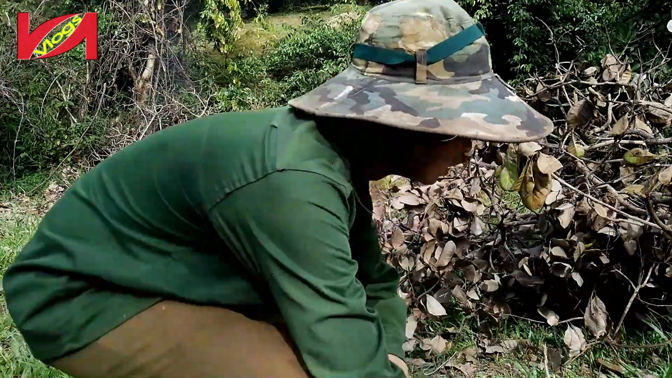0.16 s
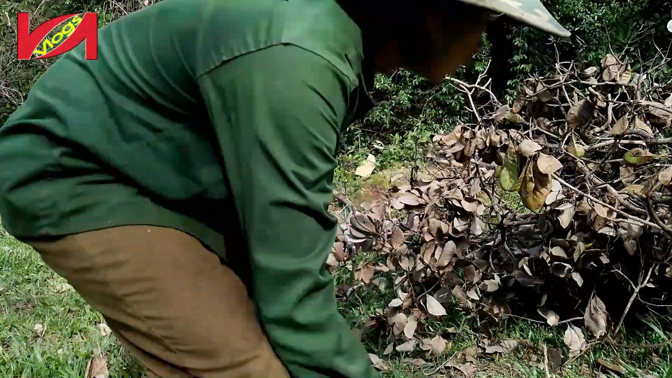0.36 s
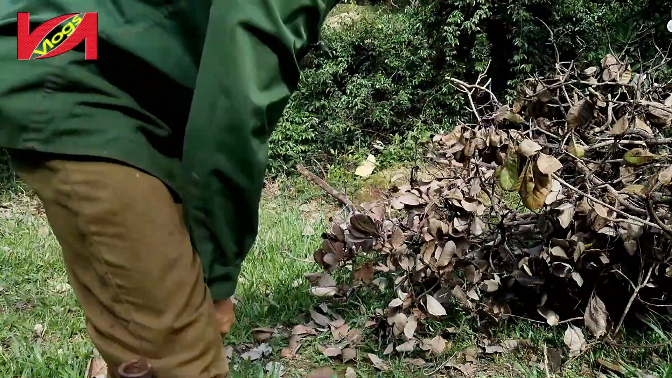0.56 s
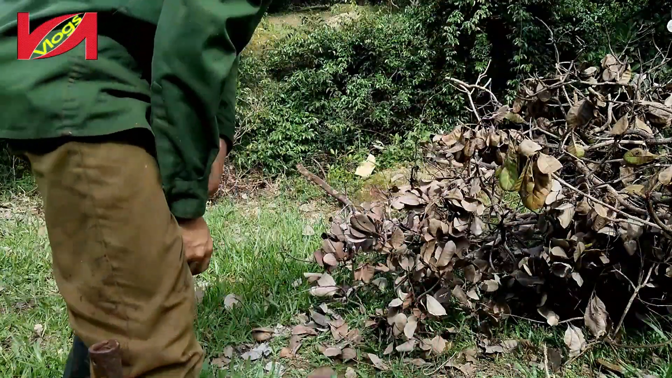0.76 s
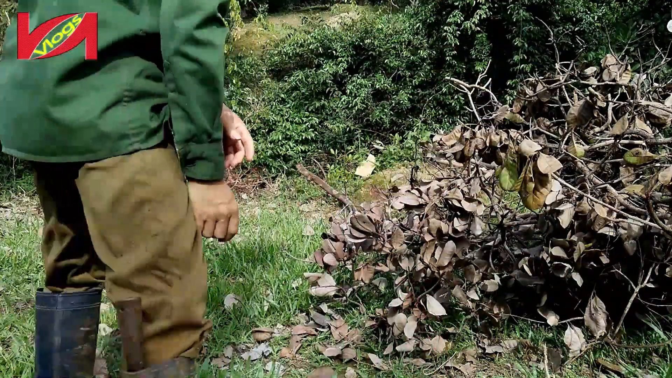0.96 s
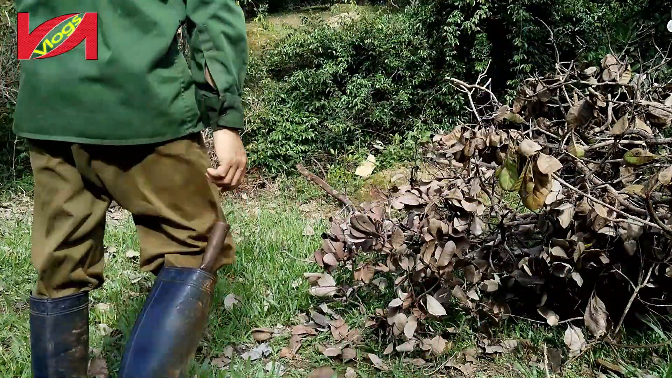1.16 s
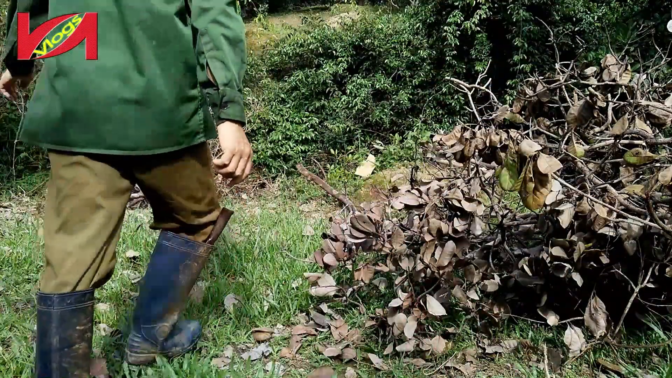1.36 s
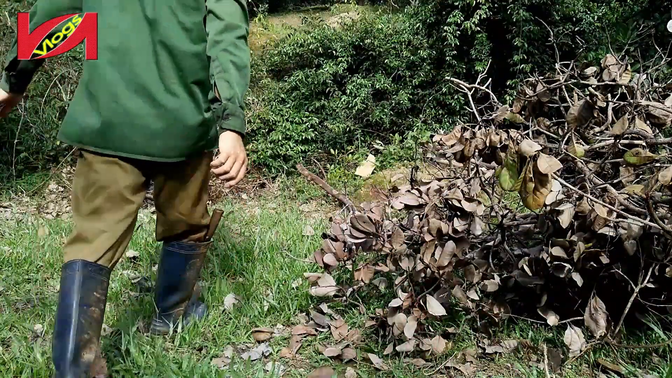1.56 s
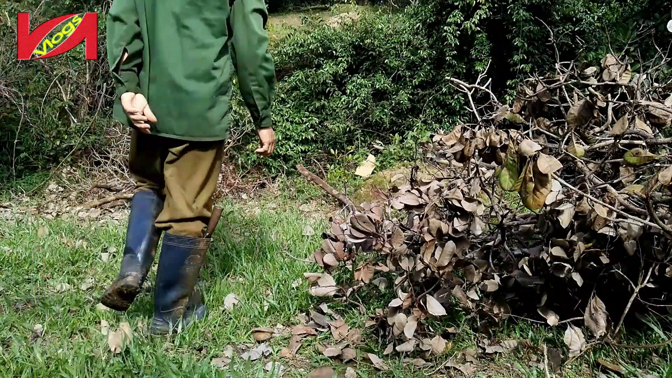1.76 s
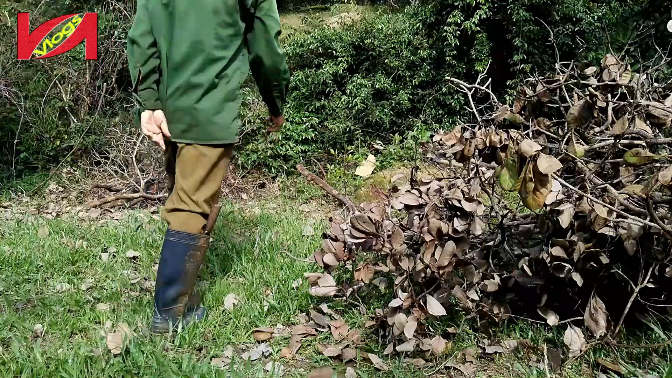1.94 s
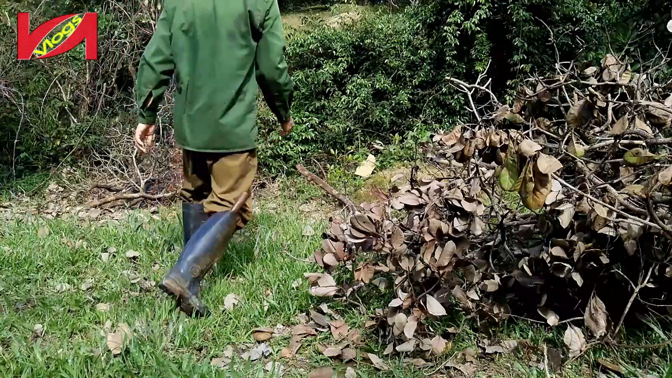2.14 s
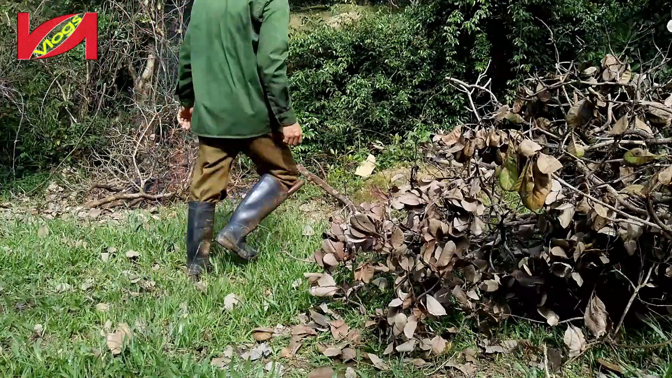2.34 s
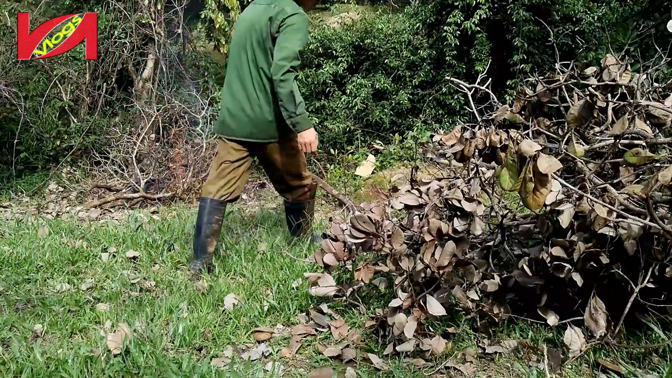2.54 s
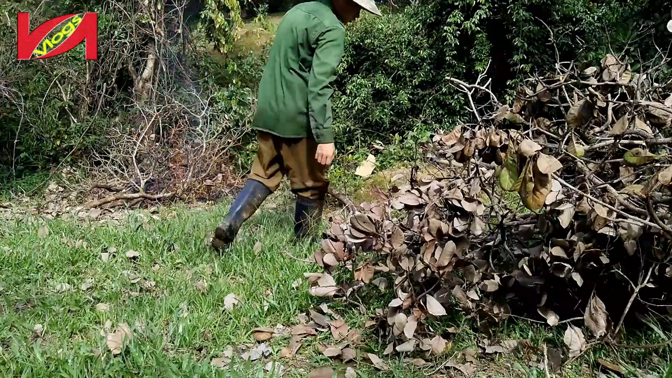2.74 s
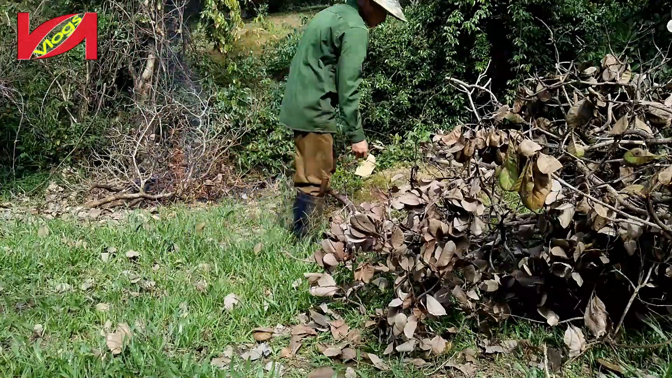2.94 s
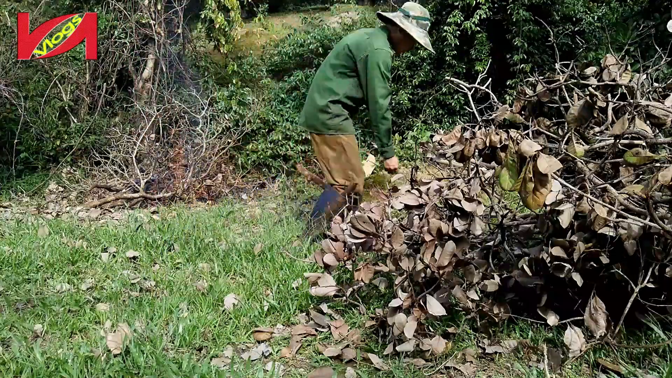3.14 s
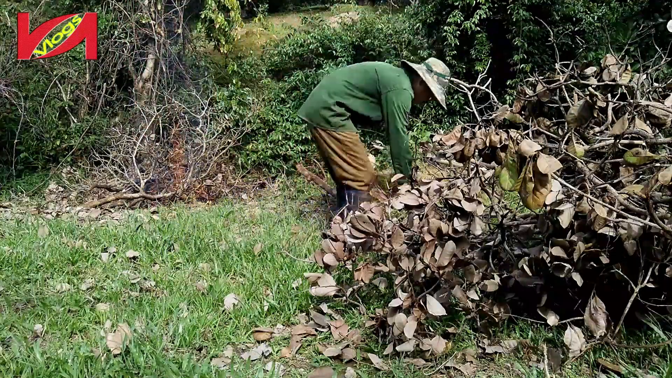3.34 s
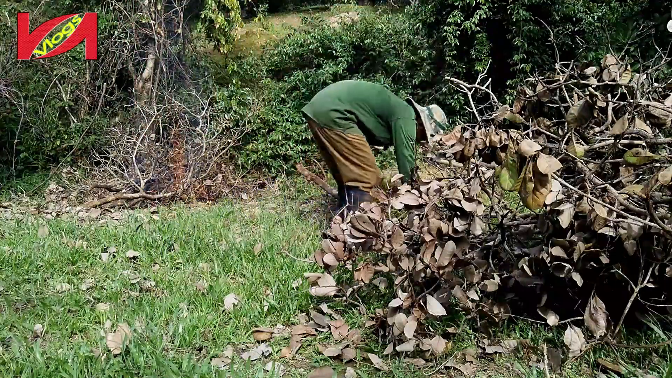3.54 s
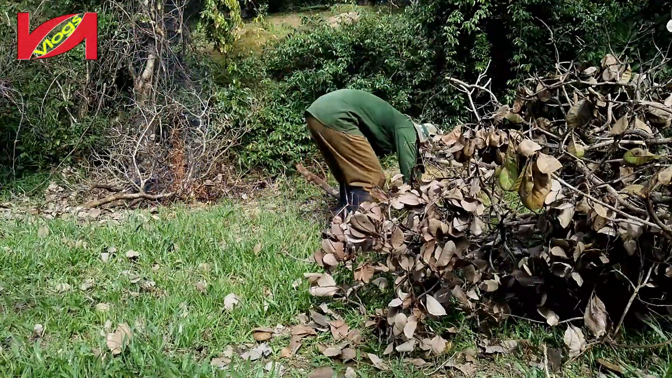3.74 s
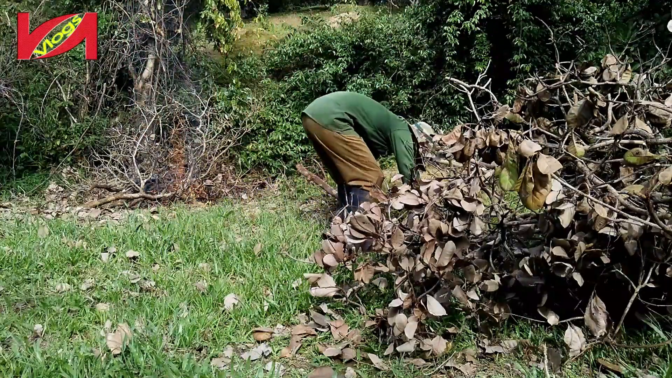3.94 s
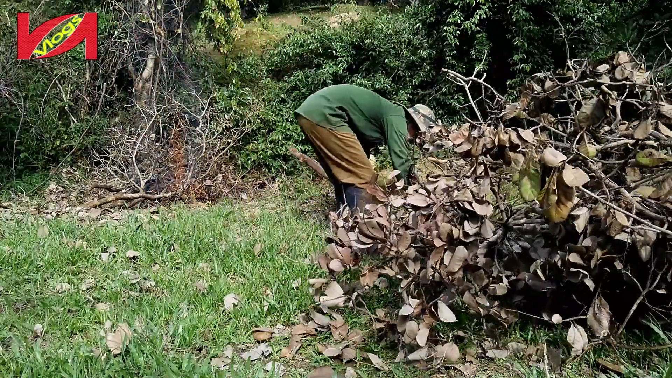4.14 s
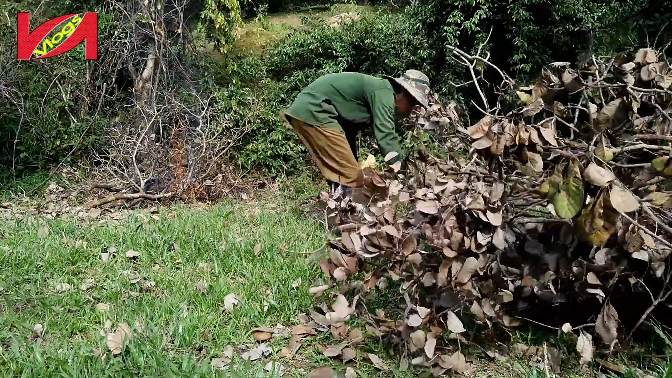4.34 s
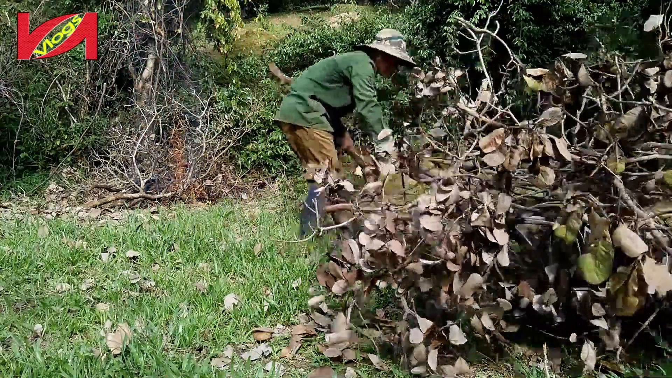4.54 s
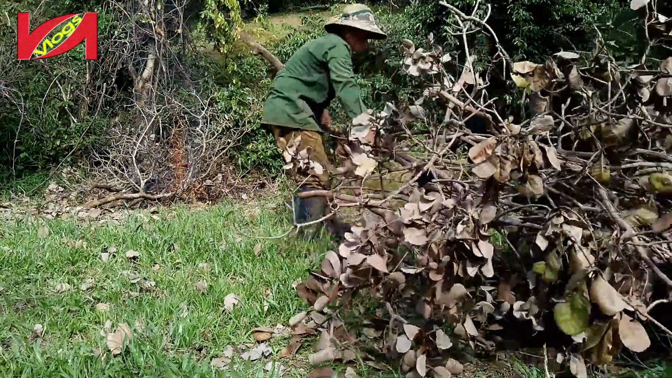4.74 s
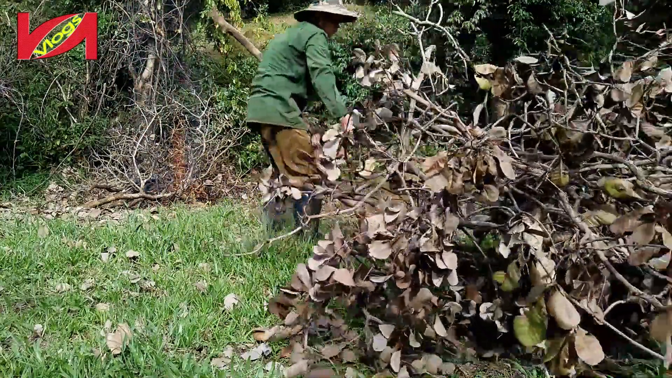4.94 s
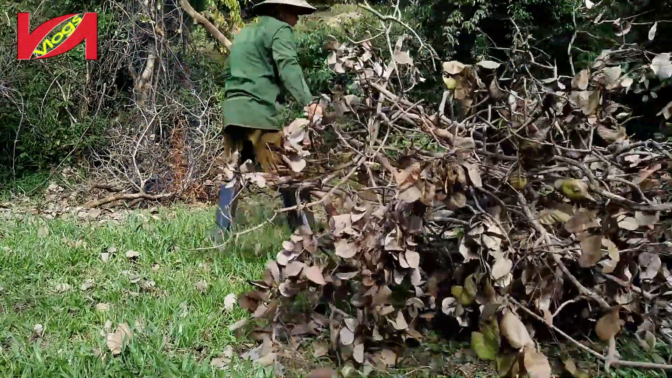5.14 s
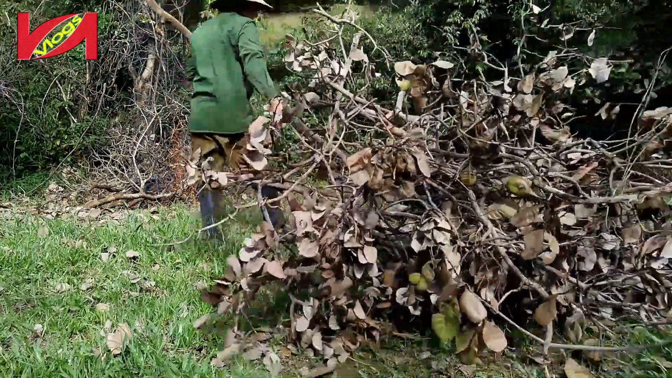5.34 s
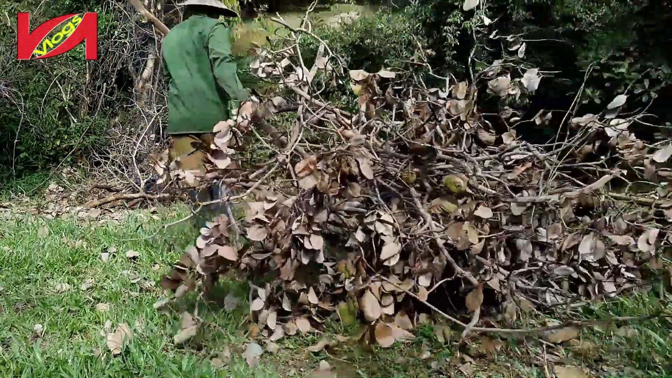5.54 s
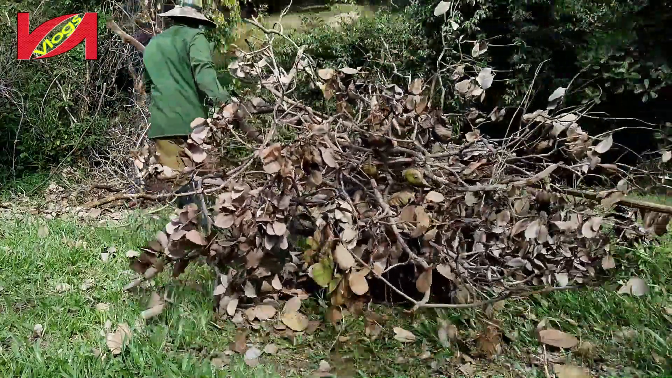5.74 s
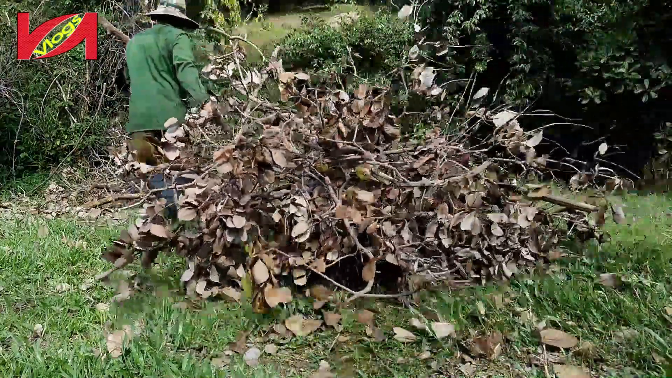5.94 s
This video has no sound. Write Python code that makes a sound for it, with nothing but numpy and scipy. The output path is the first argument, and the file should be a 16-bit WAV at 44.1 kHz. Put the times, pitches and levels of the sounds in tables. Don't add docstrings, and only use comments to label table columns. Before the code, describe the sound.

Leafy steps and small rustles give way to a dense, crisp rush of breaking dry leaves and twigs as a branch heap is pulled along turf.

```python
import sys
import numpy as np
from scipy import signal
from scipy.fft import rfft, irfft, next_fast_len
from scipy.io import wavfile
from scipy.ndimage import uniform_filter1d, minimum_filter1d

SR = 44100
rng = np.random.default_rng(int(sys.argv[2]) if len(sys.argv) > 2 else 0)


def rack_gain(trim_db):
    fader = np.asarray(trim_db, float)
    return 10 ** (fader / 20)


def put_to_file(sound):
    columns = np.atleast_2d(sound).T
    safe = np.clip(columns, -1, 1)
    whole_steps = np.round(safe * 32767)
    wavfile.write(sys.argv[1], SR, whole_steps.astype(np.int16))


N = 264159


# peak in seconds, force in dB, swell in seconds, settling in seconds, twig share in dB.
STEPS = [(1.06, -64, 0.049, 0.015, 4), (1.112, -71, .07, .04, -12), (1.19, -68, .025, 0.25, -6),
         (1.235, -62, 0.062, 0.067, -14), (1.257, -48.5, 0.012, 0.024, -8), (1.308, -57, 0.016, 0.016, -15),
         (1.335, -58.5, 0.047, 0.061, -8.5), (1.472, -66, .03, .05, -10),
         (1.635, -44.5, 0.05, 0.074, -10.5), (1.664, -45, 0.056, 0.026, -3.5), (1.734, -76, 0.046, .05, -6),
         (1.826, -60, 0.011, 0.15, -8.5), (1.905, -69, 0.061, 0.029, 0), (2.156, -55, 0.039, 0.079, -7.5),
         (2.24, -62, 0.11, 0.044, -9), (2.362, -56.5, 0.036, 0.084, -13), (2.562, -59.5, .013, 0.06, -12),
         (2.6, -53, 0.0085, 0.097, -2.5), (2.634, -34, 0.014, 0.13, -8.5),
         (2.657, -27, 0.042, 0.017, -15.5), (2.675, -50.5, 0.024, 0.086, -2),
         (2.706, -42.5, 0.02, 0.054, -13), (2.76, -57, .2, 0.043, -11), (2.91, -64, 0.061, .02, -5)]
# peak in seconds, force in dB, swell in seconds, settling in seconds, twig share in dB.
GRABS = [(3.2, -58.5, 0.17, .03, -6), (3.212, -57, 0.014, .05, -13), (3.228, -43.5, .04, .035, -11.5),
         (3.241, -45, .02, .025, -13), (3.258, -47, 0.029, 0.037, -7), (3.3, -59.5, 0.11, 0.059, -6),
         (3.345, -56.5, 0.042, 0.19, -10.5), (3.442, -49.5, 0.037, .025, -9),
         (3.476, -49, 0.067, 0.045, -9), (3.505, -53, 0.022, 0.084, -12),
         (3.526, -53.5, 0.066, 0.027, -6.5), (3.678, -76, .08, .04, -11), (3.715, -68, .03, 0.026, -5),
         (3.976, -64, 0.033, 0.12, -25), (4.012, -60, .012, .015, -7), (4.032, -54, 0.025, 0.067, -19),
         (4.153, -51, .012, 0.11, -5), (4.18, -69, 0.05, .03, -11)]
# peak in seconds, force in dB, swell in seconds, settling in seconds, twig share in dB.
TUGS = [(4.335, -36.5, 0.042, 0.062, -4), (4.446, -30.5, 0.0066, 0.066, -7), (4.53, -36, 0.088, 0.051, -5),
        (4.587, -28, 0.034, 0.035, -4), (4.636, -36, .01, .05, -6), (4.645, -17, 0.0097, 0.069, -2.5),
        (4.667, -24.5, 0.044, 0.0064, -14), (4.685, -28.5, .03, 0.13, -9), (4.772, -28, 0.08, 0.28, -7),
        (4.906, -30, 0.074, 0.074, -10.5), (4.95, -27, 0.04, 0.17, -6.5), (5.02, -25.5, 0.02, 0.14, -7),
        (5.099, -26, 0.21, 0.21, -7), (5.174, -12.5, 0.011, 0.034, -8), (5.205, -26.5, .05, 0.29, -5.5),
        (5.25, -24.5, 0.024, 0.59, -10.5), (5.308, -24, 0.23, 0.46, -7), (5.39, -26.5, 0.42, 0.24, -17),
        (5.478, -24, 0.077, 0.92, -7), (5.55, -30.5, 0.1, 0.43, -6.5), (5.62, -23.5, 0.18, 0.16, -9),
        (5.708, -20, 0.064, 0.033, -7), (5.822, -29, 0.19, 0.11, -9), (5.904, -28, 0.23, 0.62, -6.5)]


def rustle(parts):
    strokes = [(pull(), -7, -15.5)]  # force, twig share and crispness, all in dB
    for rows, crisp_db in ((STEPS, -10), (GRABS, -12), (TUGS, -12)):
        strokes += [(stroke(*row), twig_db, crisp_db) for *row, twig_db in rows]
    t = clock()
    power = np.zeros((4, len(t)))
    for force_db, twig_db, crisp_db in strokes:
        ground_db = 0.47 * twig_db - 15.
        shares = rack_gain([ground_db, twig_db, 0, crisp_db]) ** 2
        power += np.outer(shares, rack_gain(2 * force_db))
    away_s, away_db_per_s = 5.49, -19
    power[3] *= rack_gain(2 * away_db_per_s * np.maximum(t - away_s, 0))
    fresh_s, fresh_db = 4.35, 4
    power[3] *= rack_gain(2 * fresh_db * np.exp(-((t - fresh_s) / 0.38) ** 2))

    near = crackle(2200., spread_db=4.4, clump_db=2., hiss=.45)
    other = crackle(1800., spread_db=4.6, clump_db=2., hiss=.5)
    thin_db, thick_db = -56, -40
    leaf_db = 10 * np.log10(power[2])
    crowd = smooth(np.clip((leaf_db - thin_db) / (thick_db - thin_db), 0, 1))
    near, other = [(x + crowd * x[::-1]) / np.sqrt(1 + crowd ** 2) for x in (near, other)]

    out = np.zeros(N)
    for gain, share, part in zip(np.sqrt(power), (0.6, 0.55, 1.0, 0.41), parts):
        drive = near * share + other * (1 - share)
        out += smooth(gain) * evened(signal.oaconvolve(drive, part)[:N])
    return rack_gain(-0.48) * out


def crackle(per_s, spread_db, clump_db, hiss, count=12):
    size = rack_gain(spread_db * np.minimum(rng.exponential(1, N), 2.6))
    size = size * (rng.random(N) < per_s / SR)
    kind = rng.integers(0, count, N)
    t = np.arange(400) / SR
    t60 = rng.uniform(.003, .011, (count, 1))
    rattles = rng.standard_normal((count, 400)) * rack_gain(-60 * t / t60)
    pitch_hz = np.geomspace(1200, 12000, count)
    breaks = np.zeros(N)
    for k, (rattle, hz) in enumerate(zip(rattles, pitch_hz)):
        rattle = .25 * rattle + 2 * resonate(rattle, hz, .5 * hz)
        breaks += signal.oaconvolve(size * (kind == k), evened(rattle))[:N]
    bed = evened(breaks) + hiss * rng.standard_normal(N)
    return evened(bed * rack_gain(clump_db * wander(68.0) + 0.5 * wander(90.0)))


# time in seconds, force in dB.
PULL = [
    (4.205, -58),
    (4.22, -45.5),
    (4.33, -45.5),
    (4.43, -43),
    (4.56, -41),
    (4.615, -42),
    (5.0, -41),
    (5.35, -30),
    (5.99, -37),
]


def pull():
    s, db = np.transpose(PULL)
    return np.interp(clock(), s, db, left=-130)


def stroke(s, peak_db, swell, settle):
    late = clock() - s
    return peak_db - 30. * np.maximum(-late / max(swell, .005), late / max(settle, .005))


# start in seconds, peak in dB, twig share in dB, crispness in dB.
TRODDEN = [(1.0356, -59, 1, -22), (1.1107, -60, -19, -22), (1.2526, -36.5, -28, -23),
           (1.2915, -51, -24, -24), (1.3054, -45.5, -23, -21), (1.4731, -58, -14, -22),
           (1.5844, -64, -20, -19), (1.6074, -51, -19, -17), (1.6613, -38.5, -8, -15),
           (1.7315, -61, 2.5, -15), (1.8865, -53, -20, -24), (1.9104, -67, -9, -17),
           (2.1515, -50, -16, -22), (2.222, -53.5, -9, -21), (2.237, -53, -14, -24),
           (2.3867, -46, -19, -22), (2.604, -46, -8, -20), (2.655, -29, -13, -6), (2.7045, -34.5, -14, -4),
           (2.907, -49.5, -12, -29), (3.059, -51, -7, -33.5), (3.1684, -64, -10, -22),
           (3.2119, -35, -37, -30), (3.2535, -44, -26, -25), (3.303, -44, -22, -8), (3.3351, -33, -10, 1),
           (3.405, -49, -13, -16), (3.4427, -48, -22, -20), (3.462, -38, -28, -27), (3.6722, -60, -5, -4)]
# start in seconds, peak in dB, thud in dB, twig share in dB, crispness in dB.
CRACKS = [(3.8764, -29, -18.5, -14, -6.5), (3.9547, -46.5, -8, -3.5, -29), (4.0048, -23, -36, -28.5, -8),
          (4.1534, -59, -28, -12, -21), (4.3013, -30.5, -22, -23, -14), (4.333, -17, -23, -25, -34),
          (4.4017, -30, -20, -18, -27), (4.4508, -32.5, -8, -26, -18), (4.5392, -21.5, -37, -29, -12),
          (4.583, -8.5, -51, -26, -8), (4.6432, -10, -50, -6, -4.5), (4.662, -8.5, -20.5, -22, -26),
          (5.031, -12.5, -48, -27, -12), (5.107, -16.5, -34, -17, -26), (5.1713, -5.5, -41, -11, 1),
          (5.182, -7.5, -20.5, -34, -27), (5.3022, -14, -41, -8, -12), (5.336, -16, -37, -9, -29),
          (5.68, -24, -44, 0, -23), (5.6935, -7.5, -49, -11, -30), (4.6462, -11.5, -44, -5, -12),
          (4.6512, -7.5, -38, -23, -16), (4.6555, -14, -35, -14, -16), (5.3044, -14.5, -40, -27, -10)]


def twig_snaps(parts):
    thud_db = -26
    trodden = [(s, db, thud_db, *colour) for s, db, *colour in TRODDEN]
    return snaps(parts, trodden + CRACKS, echo_db=-10.0, crack=5.44)


# start in seconds, peak in dB, twig share in dB, crispness in dB.
HEAP_BREAKS = [(4.3561, -28, -22, -25), (4.3714, -31, -15, -21), (4.3775, -35, -23, -23),
               (4.514, -31, -19, -22), (4.5246, -27, -20, -14), (4.565, -25, -13, -20),
               (4.5898, -30, -19, -16), (4.6348, -26, -13, -17), (4.7326, -34, -11, -22),
               (4.768, -26, -8, -19), (4.7804, -23, -24, -20), (4.8218, -21, -19, -22),
               (4.8509, -23.5, -18, -21), (4.8813, -35, -7, -23), (4.9495, -21, -14, -17),
               (5.0475, -23, -24, -18), (5.0703, -23, -13, -23), (5.0756, -17.5, -16, -22),
               (5.1165, -21, -17, -15), (5.152, -23, -13, -20), (5.1762, -13, -17, -15),
               (5.196, -20, -17, -16), (5.216, -16.5, -8, -7), (5.25, -16, -17, -18),
               (5.2563, -17, -16, -20), (5.3182, -9.5, -17, -11), (5.349, -20, -14, -26),
               (5.3789, -16, -20, -18), (5.4765, -20, -19, -22), (5.4853, -19.5, -7, -24),
               (5.495, -13, -12, -23), (5.5443, -19, -18, -25), (5.5777, -15.5, -7.5, -19),
               (5.5997, -18.5, -13, -21), (5.6205, -14, -11, -22), (5.6466, -18, -12, -23),
               (5.6838, -15, -6, -28), (5.712, -18, -17, -19), (5.7238, -23, -19, -21),
               (5.7516, -33, -15, -22), (5.787, -20.5, -20, -30), (5.8032, -19, -21, -28),
               (5.821, -21, -21, -26), (5.8338, -25, -19, -32), (5.8552, -23.5, -17, -31),
               (5.891, -19, -6, -31), (5.9305, -26, -14, -25), (5.98, -15.5, -17, -28)]
# start in seconds, peak in dB, twig share in dB, crispness in dB.
TURF_BREAKS = [(1.2456, -50, -15, -16), (1.2638, -41.5, -15, -5), (1.356, -59, -17, -20),
               (1.6334, -53, -18, -21), (1.6373, -43, -3, -20), (1.6833, -49, -14, -19),
               (2.1688, -50, -15, -22), (2.1905, -57, -12, -23), (2.2457, -58, -11, -15),
               (2.366, -48, -26, -23), (2.6084, -41, -17, -19), (2.6236, -39, -19, -20),
               (2.633, -37, -19, -21), (2.639, -29, -12, -18), (2.6506, -21, -20, -24),
               (2.6765, -39, -15, -19), (2.6875, -39, -15, -22), (2.725, -52, -18, -14),
               (2.7545, -50, -15, -20), (2.7686, -55, -15, -17), (3.2075, -41, -25, -23),
               (3.228, -41, -25, -22), (3.239, -43, -24, -21), (3.259, -46, -14, -15),
               (3.3374, -49, -13, -9), (3.3568, -56, -21, -21), (3.3685, -49, -11, -19),
               (3.3921, -58, -17, -15), (3.4291, -53, -9, -19), (3.4758, -49, -9, -22),
               (3.48, -49, -17, -23), (3.5264, -43.5, -12, -5)]


def leaf_breaks(parts):
    thud_db = -32.
    leaves = [(s, db, thud_db, *colour) for s, db, *colour in HEAP_BREAKS + TURF_BREAKS]
    return snaps(parts, leaves, echo_db=-16.5, crack=2.7)


def snaps(parts, rows, echo_db, crack):
    out, t = np.zeros(N), np.arange(3000) / SR
    chance = rng.standard_normal((len(rows), 2, 3000))
    for (s, peak_db, thud_db, twig_db, crisp_db), (a, b) in zip(rows, chance):
        a = np.r_[crack, -1.5, a[2:]]
        splinters = a * rack_gain(-60 * t / .009)
        echo = rack_gain(echo_db) * b * rack_gain(-60 * t / 0.046)
        heard = signal.fftconvolve((splinters + echo)[None], parts, axes=1)
        heard[1] = uniform_filter1d(heard[1], size=13)
        heard = heard / abs(heard).max(axis=1)[:, None]
        levels = rack_gain(peak_db + np.array([thud_db, twig_db, 0, crisp_db]))
        add(out, s, levels @ heard)
    return out


# frequency in Hz, level in dB per Hz.
LEAVES = [(35, -60), (60, -27), (200, -22), (670, -25.5), (1800, -21.5), (4300, -14), (6000, -13.5),
          (7400, -17.5), (10400, -25.5), (11800, -28), (12700, -30.5), (14300, -47), (15200, -59.5)]
EDGES_HZ = [30, 1000, 4200, 7300, 15800]


def four_parts():
    hz = abs(np.fft.fftfreq(8192, 1 / SR))
    port_hz, port_width_hz, port_db = 5750, 900, 12.5
    ring_db = port_db / (1 + (2 * (hz - port_hz) / port_width_hz) ** 2)
    colour = np.log(rack_gain(read(LEAVES, hz) + ring_db))
    click = np.fft.ifft(np.exp(np.conj(signal.hilbert(colour)))).real[:2048]
    bands = [signal.butter(3, pair, "band", fs=SR, output="sos") for pair in zip(EDGES_HZ, EDGES_HZ[1:])]
    parts = np.array([signal.sosfilt(band, click) for band in bands])
    return parts / np.linalg.norm(parts, axis=1)[:, None]


# start in seconds, peak in dB, pitch in Hz, time to fall 60 dB in seconds.
THUDS = [(1.053, -45.5, 253, 0.024), (1.054, -55.5, 89.5, 0.023), (1.192, -60.5, 800, 0.12),
         (1.255, -64, 89, 0.06), (1.638, -50, 500, 0.032), (1.607, -67, 450, .04),
         (1.661, -48.5, 250, 0.038), (1.675, -52.5, 273, 0.008), (1.828, -61, 130, 0.053),
         (2.099, -64.5, 80, 0.27), (2.148, -60.5, 300, 0.3), (2.632, -46.5, 580, 0.42),
         (2.63, -52.5, 91, 0.56), (2.755, -55, 500, 0.041), (3.251, -58, 80, 0.22), (3.337, -62, 90, 0.24),
         (3.46, -59.5, 75, 0.33), (3.51, -58, 300, 0.16), (3.877, -62, 100, .08), (4.003, -59, 90, 0.11),
         (4.654, -53, 346, 0.2)]


def thuds():
    out, t = np.zeros(N), np.arange(6000) / SR
    for (s, peak_db, hz, t60), noise in zip(THUDS, rng.standard_normal((len(THUDS), 6000))):
        puff = noise * rack_gain(-60 * t / t60) * np.clip(t / 0.0032, 0, 1)
        push = resonate(resonate(puff, hz, 0.57 * hz), hz, 5.0 * hz)
        add(out, s, rack_gain(peak_db) * push / abs(push).max())
    return out


# peak in seconds, level in dB, swell in seconds, settling in seconds.
CATCHES = [
    (4.2, -81, .2, 0.66),
    (5.03, -58, 0.12, 0.073),
    (5.32, -55.5, 0.31, 0.38),
    (5.816, -73, .3, 0.39),
]


def rumble():
    level = rack_gain(-43 + 0.51 * pull()) + sum(rack_gain(stroke(*row)) for row in CATCHES)
    band = signal.butter(2, [45, 110], "band", fs=SR, output="sos")
    low = signal.sosfilt(band, rng.standard_normal(N))
    return evened(low * rack_gain(1.3 * wander(5.1))) * smooth(level)


# start in seconds, peak in dB, pitch in Hz.
TICKS = [(.147, -69, 4380), (.514, -65.5, 4390), (0.882, -67, 4380), (1.193, -61.5, 4400),
         (1.522, -66.5, 4400), (1.793, -66, 4400), (2.082, -66, 4400), (2.358, -61.5, 4420),
         (2.962, -64, 4420), (3.263, -63, 4440), (3.586, -65, 4400), (3.889, -61, 4550), (4.161, -58, 4320)]
# time in seconds, level in dB, pitch in Hz.
TRILLS = [
    [(.19, -84, 4570), (.24, -76, 4570), (.29, -79, 4620), (.36, -92, 4750)],
    [(.6, -90, 4600), (.66, -80, 4650), (.72, -80, 4600), (.78, -90, 4700)],
]


def insects():
    out, t = np.zeros(N), np.arange(4400) / SR
    wing_strokes = [(.004, -2), (.011, -10), (.019, 4.5), (.026, 1.5), (.033, -3)]  # seconds, dB
    chance = rng.standard_normal((len(TICKS), 4400))
    for (s, peak_db, hz), noise in zip(TICKS, chance):
        strokes = sum(rack_gain(db) * np.exp(-((t - at) / 0.0031) ** 2) for at, db in wing_strokes)
        drift = 1.2 * evened(uniform_filter1d(noise, size=300))
        buzz = strokes * np.sin(2 * np.pi * hz * t + drift)
        echo = evened(resonate(noise, hz, 300.)) * rack_gain(-1.5 - 60 * t / 0.19)
        echo = echo * np.clip(t / 0.014, 0, 1) ** 2
        add(out, s - .019, rack_gain(peak_db) * (buzz + echo))
    for rows in TRILLS:
        s, db, hz = np.transpose(rows)
        t = np.arange(s[0], s[-1], 1 / SR)
        whistle = resonate(rng.standard_normal(len(t)), np.interp(t, s, hz), 140.)
        add(out, s[0], evened(whistle) * rack_gain(np.interp(t, s, db)))
    return out


# frequency in Hz, level in dB per Hz.
AIR = [(24, -20), (40, -8.5), (49, 2.5), (84, -2.5), (213, -13), (301, -15.5), (458, -15.5), (768, -21),
       (3530, -22), (4630, -16), (5920, -15.5), (6700, -13.5), (7390, -26.5), (12100, -27), (14400, -29.5)]


def air():
    frames, hz = N // 256 + 5, np.fft.rfftfreq(1024, 1 / SR)
    a, b, patches = rng.standard_normal((frames, 513, 3)).T
    patches = uniform_filter1d(patches, size=10, axis=0)
    patches = evened(uniform_filter1d(patches, size=16, axis=1))
    z = (a + 1j * b) * rack_gain(read(AIR, hz)[:, None] + 0.55 * patches)
    return rack_gain(-71.5) * evened(signal.istft(z, nperseg=1024, noverlap=768)[1][:N])


def evened(x):
    return x / np.sqrt(np.mean(x ** 2) + 1e-20)


def read(points, hz):
    f, value = np.transpose(points)
    return np.interp(np.log(hz + 1), np.log(f + 1), value)


def add(mix, s, sound):
    part = mix[..., round(s * SR):][..., :sound.shape[-1]]
    part += sound[..., :part.shape[-1]]


def wander(per_s):
    pole = np.exp(-2 * np.pi * per_s / SR)
    return evened(signal.lfilter([1], [1, -2 * pole, pole ** 2], rng.standard_normal(N)))


def resonate(x, hz, width):
    turn = np.exp(2j * np.pi * np.cumsum(hz * np.ones(len(x))) / SR)
    r = np.exp(-np.pi * width / SR)
    return 2 * (turn * signal.lfilter([1 - r], [1, -r], x / turn)).real


def passband(x, low_hz, high_hz):
    size = next_fast_len(N, True)
    hz = np.fft.rfftfreq(size, 1 / SR)
    gain = np.clip((high_hz - hz) / 250, 0, 1) * np.clip(hz / low_hz, 0, 1) ** 4
    return irfft(rfft(x, size) * gain, size)[:N]


def clock():
    return np.arange(N // 32 + 2) * 32 / SR


def smooth(control):
    return np.interp(np.arange(N) / SR, clock(), control)


def scene():
    parts = four_parts()
    limited = passband(rustle(parts) + leaf_breaks(parts) + air(), 45.0, 14500.)
    mix = limited + twig_snaps(parts) + thuds() + rumble() + insects()
    return np.tile(mix, (2, 1))


# frequency in Hz, chance from 0 to 1.
LOOSE = [(4100, 0), (4200, .12), (5500, .24), (6800, .35), (7600, .7), (9000, .88), (11500, .85),
         (12500, .5), (14300, .4)]


def treble_side(x):
    hz, t, z = signal.stft(x, SR, nperseg=1024, noverlap=768)
    band = (np.log(hz + 1) * 7.5).astype(int)
    block = np.arange(len(t)) // 6
    draw = rng.random((block[-1] + 1, band.max() + 2))
    mixed = (.6 * draw[:, :1] + .4 * draw[:, 1:] - .5) * 1.3 + .5
    power = abs(uniform_filter1d(abs(z) ** 2, size=12, axis=0))
    total = uniform_filter1d(power[100:].sum(0), size=2)
    steady = total < 8 * minimum_filter1d(total, size=7)
    loose = mixed[block][:, band].T < read(LOOSE, hz)[:, None]
    loose = loose & (hz[:, None] > 4150) & steady
    a, b = rng.standard_normal((len(t), len(hz), 2)).T
    noise = loose * np.sqrt(power) * (a + 1j * b)
    side = signal.istft(noise, SR, nperseg=1024, noverlap=768)[1][:N]
    high = signal.butter(10, 4050, "high", fs=SR, output="sos")
    return signal.sosfiltfilt(high, side) * rack_gain(-2.4)


def roll_off(x):
    return signal.sosfilt(signal.butter(12, 14520, fs=SR, output="sos"), x)


def record(dry):
    offset = -.00035
    mix = dry + offset + treble_side(dry[0]) * np.array([[1], [-1]])
    return roll_off(mix)


dry = scene()
out = record(dry)
put_to_file(out)
```